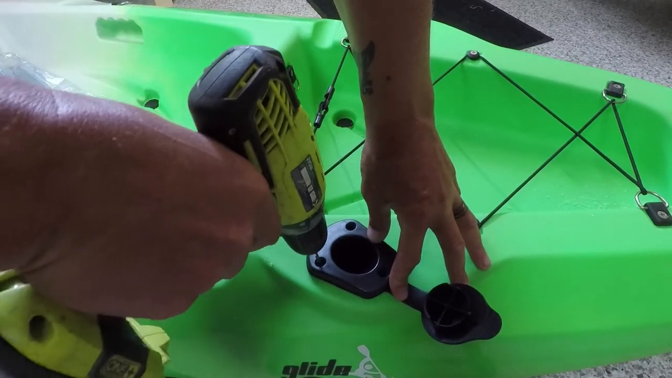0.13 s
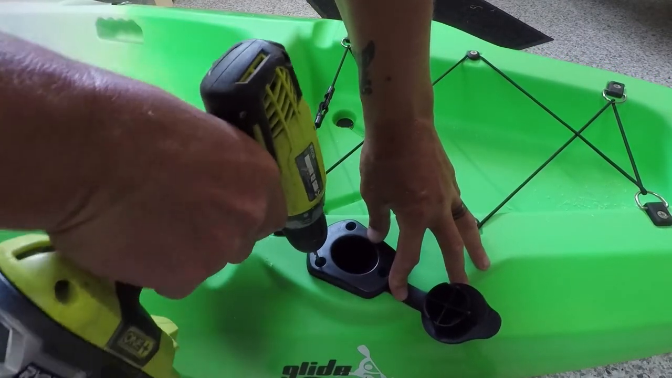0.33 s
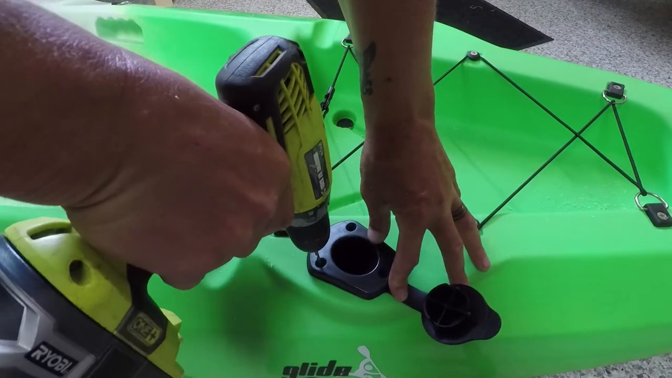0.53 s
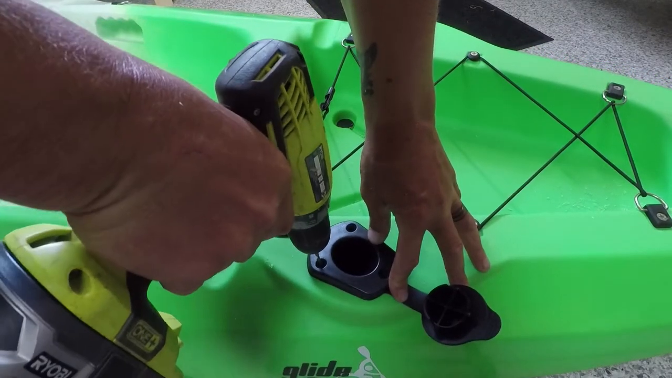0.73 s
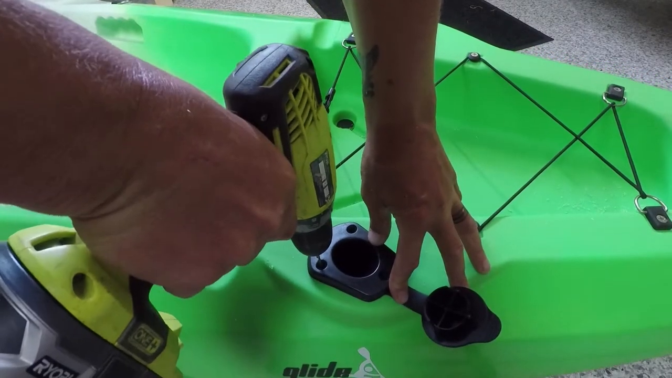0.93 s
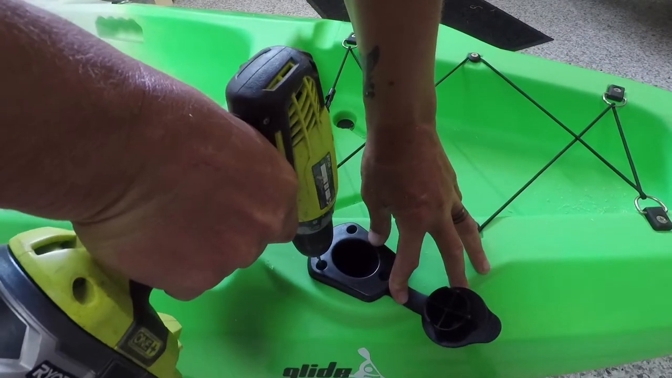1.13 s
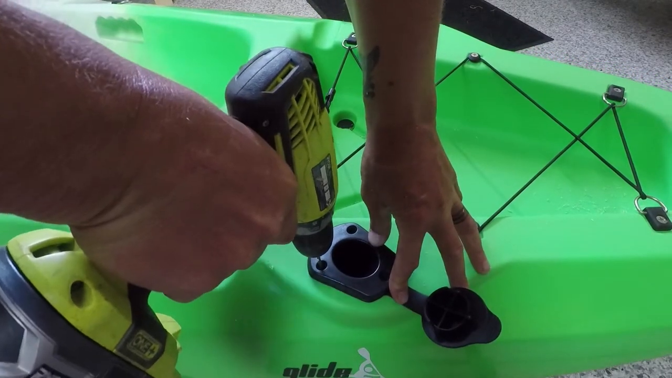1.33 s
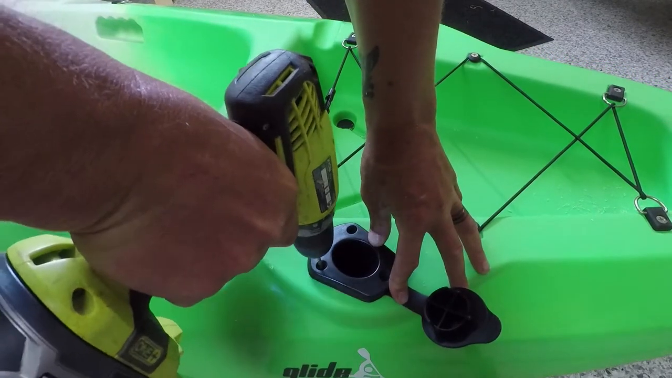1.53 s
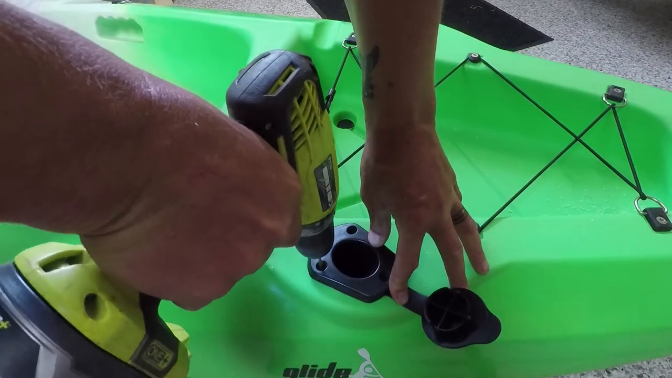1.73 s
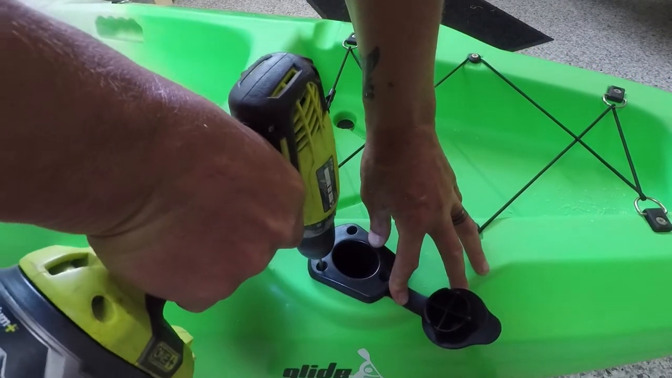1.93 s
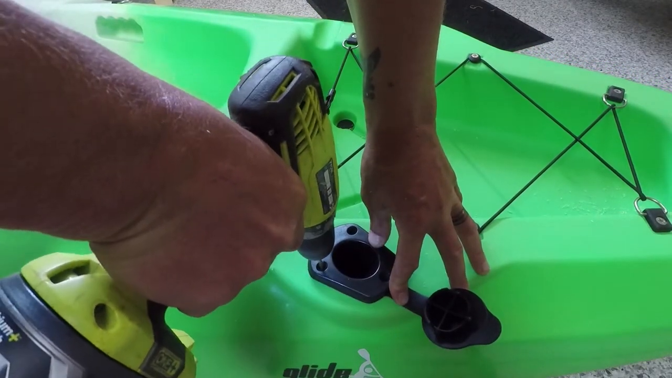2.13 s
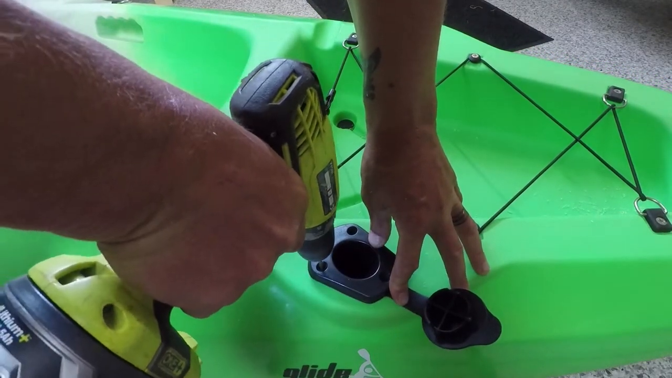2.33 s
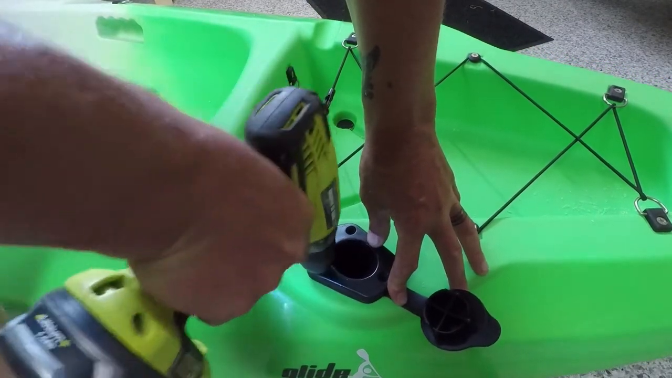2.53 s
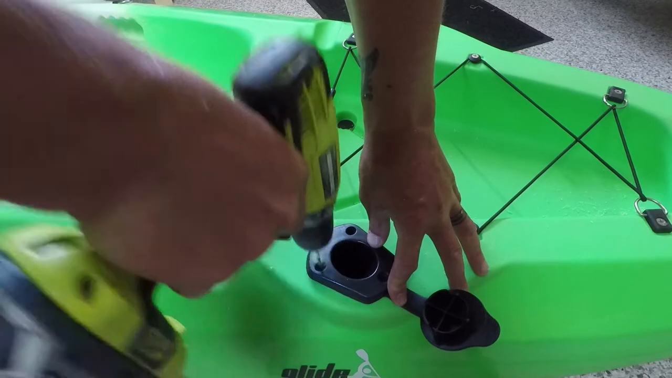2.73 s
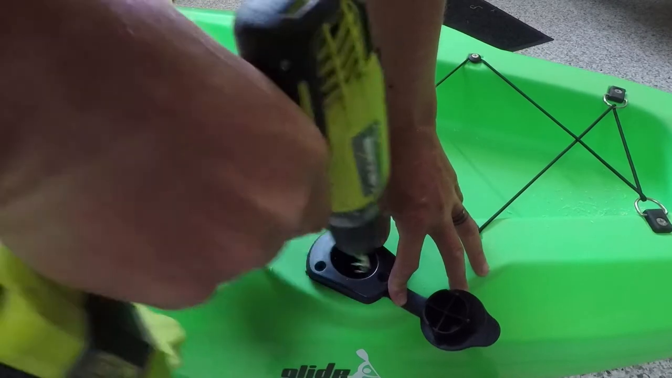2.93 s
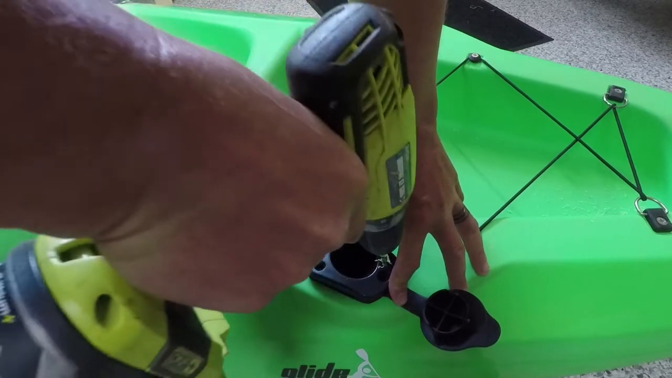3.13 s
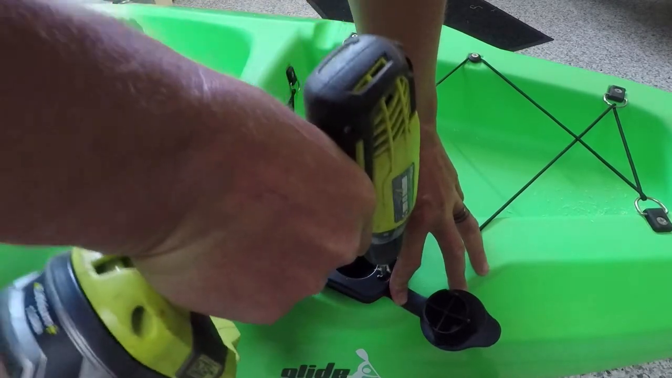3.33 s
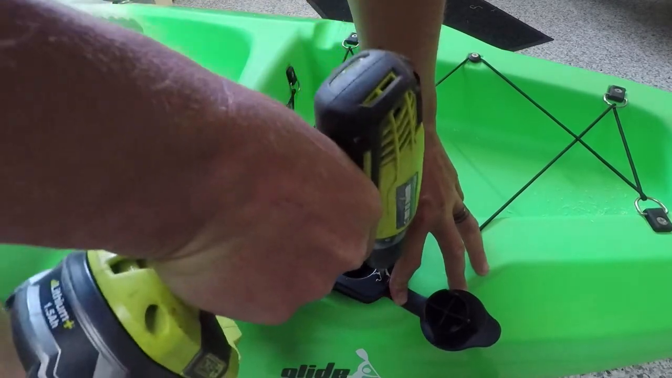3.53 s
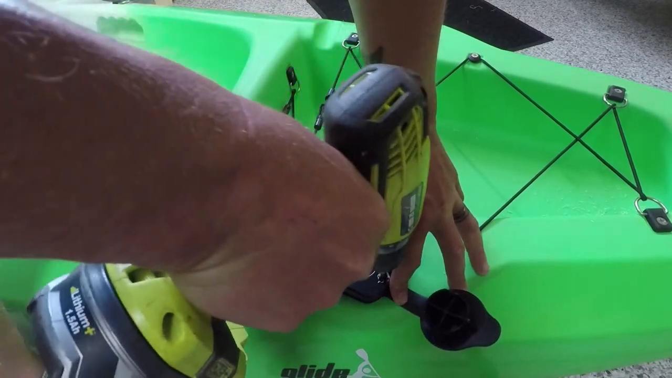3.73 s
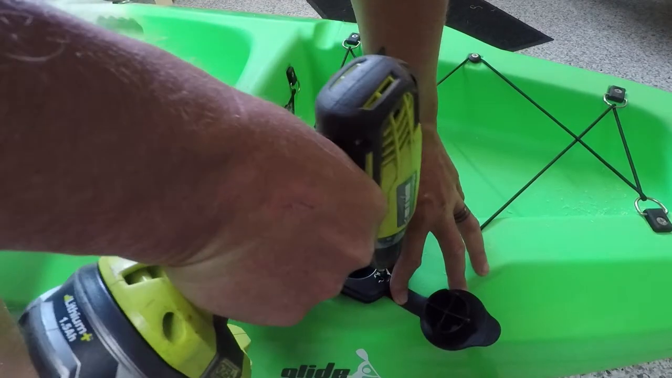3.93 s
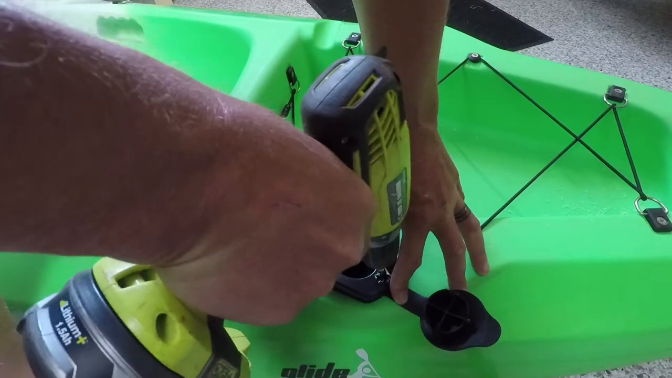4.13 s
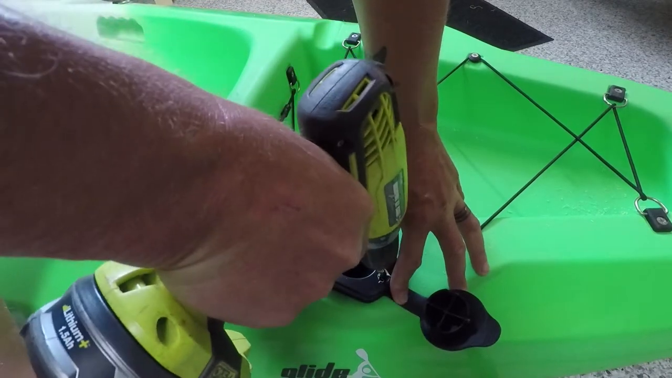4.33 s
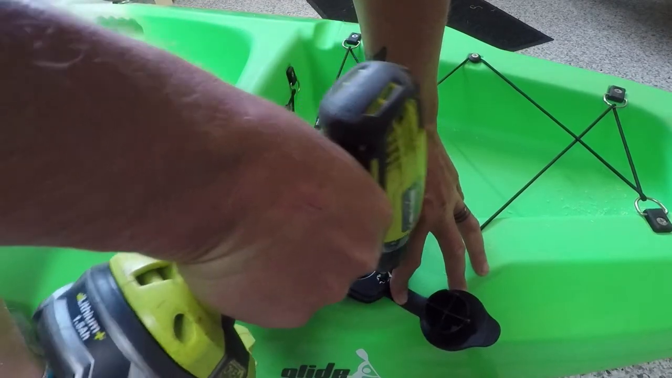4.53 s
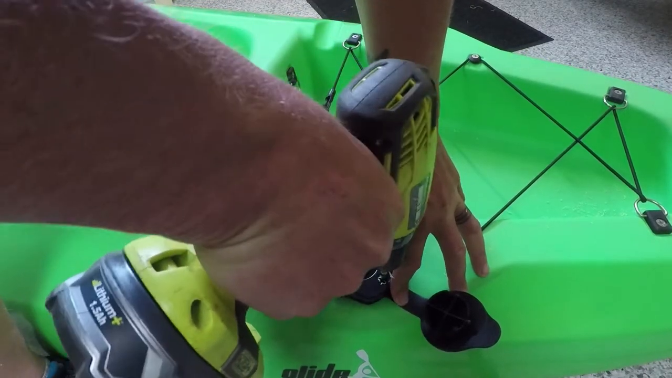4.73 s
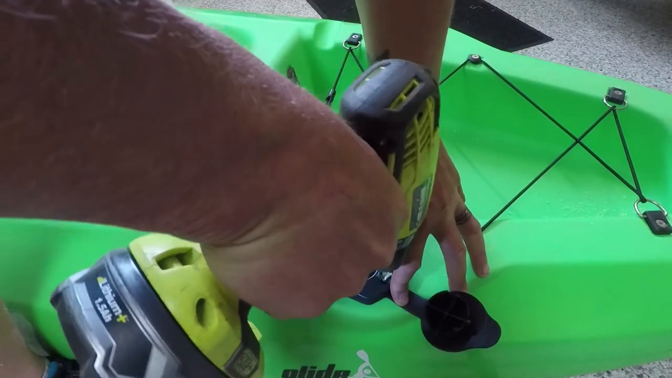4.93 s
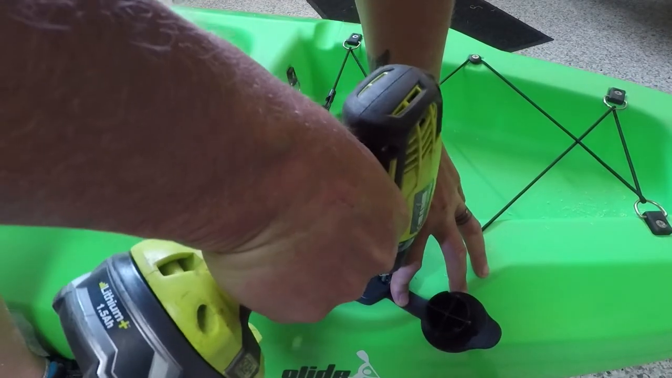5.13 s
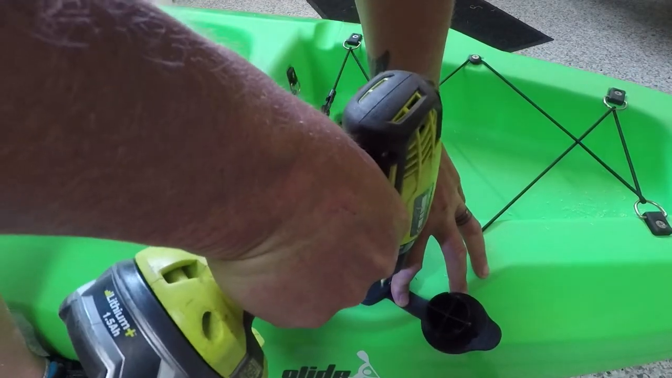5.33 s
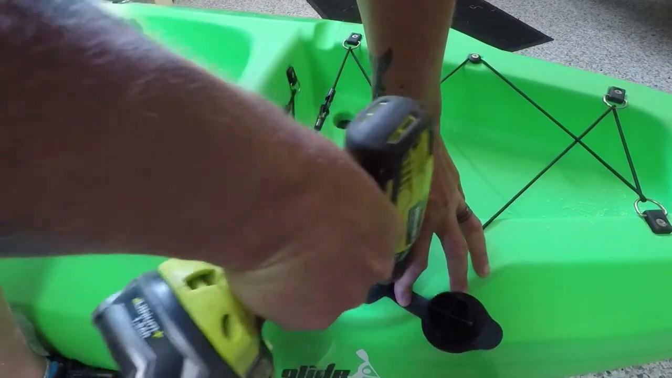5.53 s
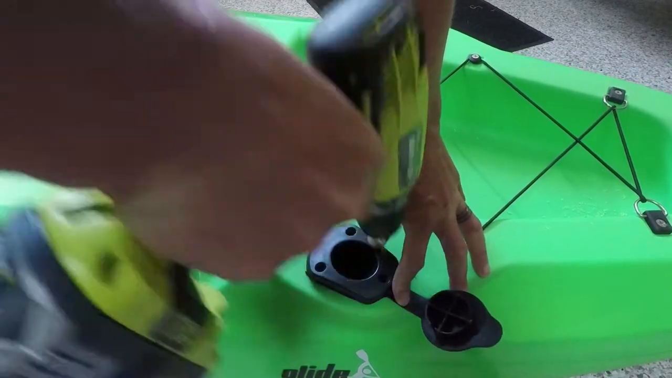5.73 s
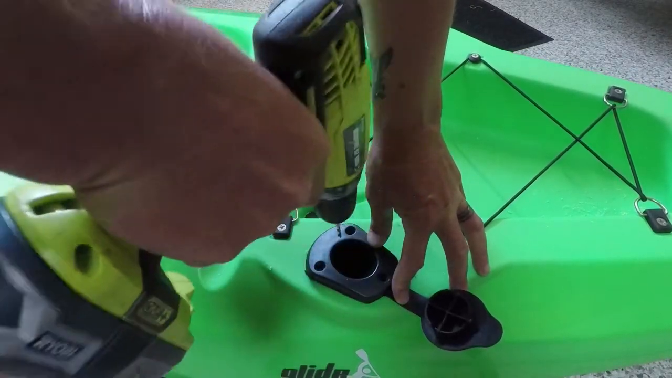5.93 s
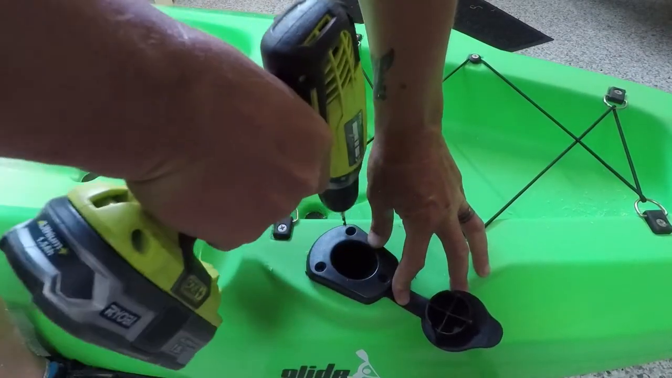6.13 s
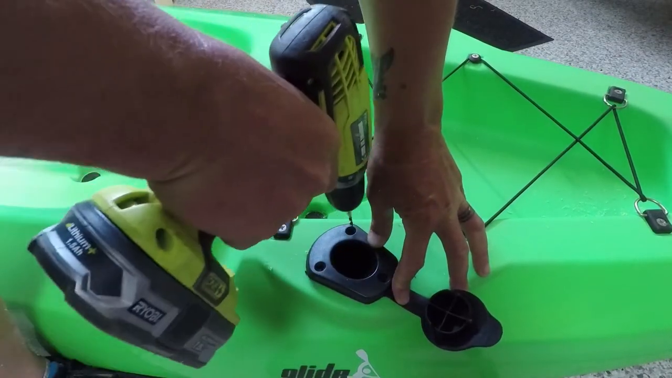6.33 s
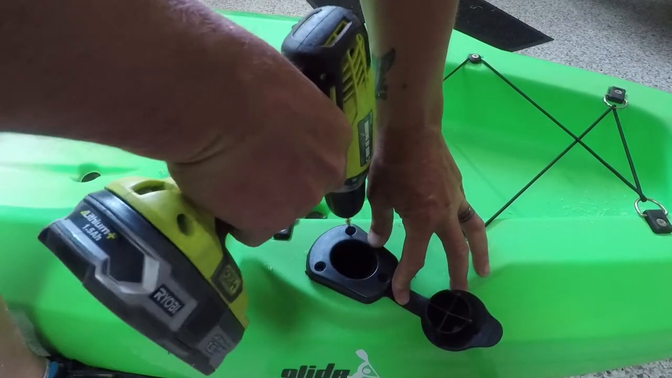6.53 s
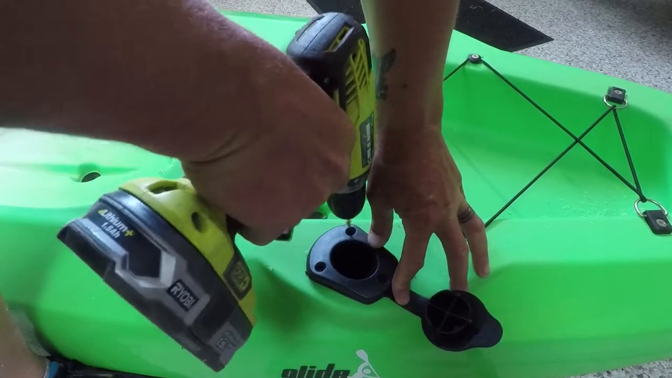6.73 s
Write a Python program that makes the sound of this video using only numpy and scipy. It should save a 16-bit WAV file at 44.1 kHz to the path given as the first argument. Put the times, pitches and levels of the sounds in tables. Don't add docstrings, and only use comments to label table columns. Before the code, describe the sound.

A cordless drill blips, then whines through hollow plastic with a rattling snag and clacking stop; after quiet handling taps, a second shorter run follows.

```python
import sys
import numpy as np
from scipy import signal
from scipy.fft import rfft, irfft, next_fast_len
from scipy.io import wavfile
from scipy.ndimage import uniform_filter1d

SR = 44100
rng = np.random.default_rng(int(sys.argv[2]) if len(sys.argv) > 2 else 0)


def makeup_ratio(level_db):
    decades = np.asarray(level_db, float) / 20
    return 10 ** decades


def output_pcm(signal):
    pcm = np.clip(np.atleast_2d(signal).T, -1, 1) * 32767
    wavfile.write(sys.argv[1], SR, np.round(pcm).astype(np.int16))


N = 299439

TEETH = 12
# shaft_multiple, level_db
SHAFT_ORDERS = [(1, -5), (2, 3), (3, -5), (4, -5), (5, 3), (6, -4), (8, 4), (10, 8), (11, -5.5), (13, 11),
                (14, -2.5), (15, 6), (16, 3), (17, 7), (18, 5), (19, 5), (20, 8), (21, 7), (22, 5),
                (24, 1.5), (25, 8), (27, 5), (28, 2), (30, 9), (32, 5), (35, 8), (41, 6), (42, 4)]
# pitch_hz, density_db_per_hz
GEARBOX_SHELL = [(180, -42), (300, -22), (358, -16.5), (495, -19.5), (686, -13), (1180, -11), (1760, -4),
                 (2590, -1), (3170, -8), (3870, -4.5), (4020, -9.5), (4730, -9.5), (6000, -14),
                 (7800, -38.5), (13200, -120)]
# pitch_hz, density_db_per_hz
FAN_VENTS = [(2650, -29), (4500, -2), (4720, -8), (5560, -6), (6700, -3), (7260, -6.5), (8600, 0),
             (9820, -11), (10700, -15), (10900, -17.5), (11600, -16), (12500, -12), (14700, -13),
             (15700, -23), (16000, -61)]
# pitch_hz, gain_db
ORDER_LIFT = [(200, -11.5), (345, -5), (520, -11), (700, -4), (1700, 1), (3400, 1), (4400, 4.5), (4900, 13),
              (5250, 4), (5800, -6.5), (7000, 5.5), (7700, -3.5), (8500, 7), (9600, -8.5), (10350, -1),
              (11100, -12), (12100, -4), (13000, -12), (14300, -8), (15500, -16)]
# pulled_s, released_s
PULLS_A = [
    (1.333, 1.434),
    (1.668, 2.712),
]
PULLS_B = [
    (4.823, 5.626),
]
BRAKE_A = 2.763
BRAKE_B = 5.673
# time_s, share_of_full_load
LOAD_A = [(1.87, 0), (2.006, 0.21), (2.244, 0.39), (2.336, 0.78), (2.37, 0.82), (2.412, 0.55),
          (2.442, 0.81), (2.712, 0.12)]
LOAD_B = [(4.95, 0.1), (5.24, 0.31), (5.3, 0.42), (5.345, 0.84), (5.38, 0.62), (5.452, 0.9), (5.622, 0.23)]
# full_speed_whine_db, shaft_hum_db, break_in_s, runs_free_s, bite_db
HOLE_A = (-26, -44.5, 2.5, 3, -27)
HOLE_B = (-21.5, -49.5, 5.5, 6, -27)
# time_s, peak_db, ring_hz, burst_ms
CLACKS = [(1.322, -22, 3000, 2), (1.3258, -5, 3700, 1.5), (1.330, -5.5, 2250, 2.6), (2.364, -10, 1750, 6.9),
          (5.377, -9.5, 1750, 5), (2.767, -14, 1514, 2.7), (2.7731, -9, 3700, 3), (2.777, -12, 1472, 5),
          (2.783, -17, 2400, 3), (2.7893, 3, 2000, 1.4), (2.7912, -1, 2204, 2), (2.7932, -1, 1800, 1.8),
          (2.7975, -8, 2100, 2.7), (2.803, -16, 1814, 2.3), (4.8153, -10.5, 2500, 2.5),
          (4.817, -8, 1603, 2.4), (4.8195, -19.5, 1820, 3.7), (5.676, -9.5, 1680, 6), (5.685, -8, 2094, 4),
          (5.695, -14, 3895, 3.9), (5.7003, 2, 1870, 2), (5.7045, -7, 2500, 1.3), (5.710, -11, 4000, 3.3),
          (5.7192, -4.5, 1610, 1.5), (5.7064, -9, 1500, 1.7), (5.689, -8, 2600, 3), (5.7231, 1, 2300, 1.7),
          (5.732, -17.5, 2500, 3), (5.738, -18, 1700, 3), (5.743, -12.5, 3820, 4), (5.748, -22, 2600, 3),
          (5.759, -28, 3500, 1.7), (5.768, -32, 1800, 3), (2.809, -21, 3900, 3.6), (2.816, -24, 1500, 2),
          (2.831, -26, 3000, 1.5)]
# pitch_hz, level_db, t60_s
DRILL_SHELL = [(1300, -1.5, 0.0049), (1710, -2, 0.016), (2500, -4.5, 0.013), (3300, -6.5, 0.0045),
               (4030, -4, 0.0079), (5470, -9.5, 0.0067), (7060, -6, 0.0044), (8730, -11.5, 0.012),
               (11100, -17, 0.001)]
# pitch_hz, level_db, t60_s
HULL = [(107, 1.5, 0.17), (149.6, -0.5, 0.18), (175, -0.5, 0.091), (241.3, -1, 0.1), (285, -10, 0.12),
        (345, -3, 0.083), (389, -1.5, 0.085), (453, -9.5, 0.093), (510, -5, 0.071), (630, -10, 0.1),
        (674, -13, 0.028), (820, -14, 0.085), (936, -11, 0.089), (1120, -14.5, 0.034), (1400, -22, 0.044)]
# time_s, peak_db,
# brightness_db, ring_hz
CATCHES = [(1.326, -26, -4, 600), (4.816, -27, -6, 597), (2.339, -24, -22, 110), (2.384, -22, -20, 150),
           (2.414, -10.5, -0.5, 405), (2.433, -12.5, -18.5, 387), (2.477, -23, -12, 353.5),
           (2.51, -21, -9, 428.3), (2.535, -22.5, -10, 383), (2.564, -16.5, -3.5, 943),
           (2.585, -19, -10, 364), (2.61, -20, -13, 360), (5.343, -22, -24, 120), (5.385, -27, -20, 110),
           (5.41, -11, -3.5, 405), (5.42, -14.5, -18, 150), (5.439, -15, -14.5, 352),
           (5.463, -14.5, -5.5, 338), (5.508, -15, -2.5, 399), (5.558, -27.5, -17, 415)]
# time_s, peak_db, ring_hz, treble_db
TICKS = [(0.08, -45, 2330, -14.5), (0.166, -41.5, 2090, -14), (0.437, -42.5, 2220, -13),
         (0.594, -51, 2220, -18), (0.66, -36.5, 840, -20), (0.691, -36.5, 934, 2), (0.756, -50, 1100, -5),
         (0.771, -45, 708, -28), (0.79, -45, 2040, -11), (0.806, -43, 1040, -1), (0.822, -53, 724, -24.5),
         (0.84, -49, 942, -26), (0.959, -41.5, 1630, -17), (0.997, -49, 974, -18), (1.02, -50, 1060, -15),
         (1.089, -44, 1707, -16), (1.119, -49.5, 1040, -16.5), (1.138, -55.5, 1250, -6),
         (1.164, -44, 907, 4), (1.286, -39.5, 2130, -0.5), (4.108, -45.5, 1710, -24),
         (4.691, -48, 734, -13), (4.716, -48.5, 1844, -13), (4.74, -60.5, 818, 1), (4.775, -56, 830, -15)]
# time_s, peak_db, boom_db, ring_hz, treble_db
KNOCKS = [(0.114, -54, -50, 2420, -15), (0.458, -48, -48.5, 1120, -21), (3.198, -50, -55, 1106, -20),
          (3.381, -33.5, -31, 1575, -17), (3.449, -58, -36.5, 982, -15), (3.483, -40, -35.5, 964, -32),
          (3.499, -44, -56, 1000, -31), (3.658, -31.5, -28.5, 1510, -15), (3.775, -60, -56, 856, -24),
          (3.795, -52, -53, 693, -16), (3.856, -54, -51.5, 790, -16), (4.506, -40, -27.5, 707, -27.5),
          (4.613, -49, -48, 2200, -15), (4.635, -35.5, -45.5, 900, -12), (6.177, -27, -19.5, 1780, -22),
          (6.36, -42, -33.5, 1790, -34), (6.413, -62.5, -45.5, 787, -23.5), (6.472, -36, -49, 2300, -16),
          (6.478, -27, -31.5, 1470, -19), (6.493, -39, -39.5, 1380, -10), (6.578, -42, -40, 3360, -15),
          (6.625, -49, -50, 1614, -23), (6.73, -39, -32.5, 1590, -20.5)]
# start_s, length_s, level_db, change_db
SCUFFS = [(0.153, 0.054, -65, 4), (0.7, 0.12, -59, -22), (3.44, 0.12, -49, -15.5),
          (3.56, 0.37, -58.5, -7.5), (4.224, 0.079, -72, 5), (4.641, 0.24, -59, -4),
          (6.181, 0.09, -48.5, -22), (6.475, 0.044, -54, -8), (6.549, 0.256, -69.5, 6)]
# pitch_hz, density_db_per_hz
SCUFF_SPECTRUM = [(240, -38), (400, -5.5), (887, -4.5), (967, -2), (1210, -12.5), (1300, -12),
                  (1590, -12.5), (1730, -2), (2030, -13.5), (2690, -12.5), (3480, -25.5), (5180, -21),
                  (12000, -35), (15600, -66), (22000, -120)]
# start_s, length_s, level_db, pitch_hz
SQUEAKS = [(3.437, 0.042, -61, 1750), (3.475, 0.045, -53, 960), (3.481, .03, -57, 2700),
           (3.48, .02, -63, 5300), (3.605, 0.034, -70, 5900), (3.615, .02, -70, 3650),
           (3.768, .008, -65, 7300), (3.793, 0.011, -60, 2650), (3.814, 0.031, -68, 3550),
           (3.82, 0.028, -70, 6320), (6.574, 0.017, -53.5, 5900), (6.575, .014, -56, 3300),
           (6.585, .06, -69, 6400), (6.59, 0.037, -68.5, 3400), (6.592, 0.015, -60, 1000),
           (6.469, .01, -52, 2300), (6.501, .025, -56, 1300), (6.725, 0.013, -58, 4800),
           (6.23, .03, -59, 950)]
# full_from_s, held_s, mount_rumble_db, hull_murmur_db
LEANS = [(0.0, 0.28, -53, -58.5), (0.4, 0.02, -37.5, -64), (0.55, 0.11, -49, -73), (0.76, 0.074, -72, -63),
         (0.96, 0.17, -72, -64.5), (1.5, 0.05, -52, -71), (1.83, 0.49, -45.5, -72.5),
         (2.42, 0.33, -41, -70), (3.44, 0.098, -46.5, -48.5), (3.68, 0.23, -45.5, -53),
         (4.07, 0.079, -58, -61.5), (4.55, 0.15, -68.5, -57.5), (5.0, 0.3, -50, -70),
         (5.39, 0.02, -35, -70.5), (5.5, 0.31, -46, -55), (6.24, 0.0096, -44, -41),
         (6.35, 0.48, -51.5, -56)]
# pitch_hz, t60_s
GARAGE_DECAY = [(150, 0.28), (700, 0.63), (2000, 0.56), (5000, 0.5), (12000, 0.38)]
# pitch_hz, level_db
WALLS = [(150, 1), (600, 0.5), (1100, -0.5), (1800, -6.5), (4000, -4.5), (6000, -0.5), (8500, -2.5),
         (15000, -2)]
# delay_s, level_db
SLAPS = [(.04, -15.5), (.072, -20)]
# pitch_hz, density_db_per_hz
FLOOR = [(29, -32.5), (50, 3), (131, -1), (213, -16.5), (495, -7.5), (802, -15.5), (1700, -17), (3180, -24),
         (13500, -32), (14900, -29.5), (16000, -56.5)]

FREE_HZ, START_HZ, SAG_HZ = 4196, 1200, 199.8
SPIN_UP_S, COAST_HZ_PER_S, BRAKING_S = 0.037, 4800, 0.033
RATTLE_DB, HISS_DB, SHAVING_DB = -26.5, -24.5, -45
WHINE_SLOW_DB, RATTLE_SLOW_DB, HISS_SLOW_DB = 22, 9.5, 20
WHINE_LOAD_DB, RATTLE_LOAD_DB, HISS_LOAD_DB = -1, 2, 0.4
PULL_DB = 11.5
COASTING_DB, THROUGH_DB = -3.5, -2.5
BITE_RISE_DB_PER_S, BITE_SAG_DB_PER_S, BITE_FALL_DB_PER_S = 250.5, 20.5, 71
CLACK_TREBLE_DB = -9
TICK_BOOM_DB, TICK_MS, KNOCK_MS = -21, 4.8, 6.5
RUMBLE_ON_DB_PER_S, MURMUR_ON_DB_PER_S, LEAN_OFF_DB_PER_S = 198, 603, 100.5
STILL_RUMBLE_DB, STILL_MURMUR_DB = -75.5, -72.5
SQUEAK_WIDTH = 0.054
FLOOR_DB = -62.5


def motor(*run):
    start, mesh_hz, (whine_db, rattle_db, hiss_db, bite_db, hum_db) = controls(*run)
    n = len(mesh_hz)
    turns = np.cumsum(mesh_hz / TEETH) / SR + .004 * wander(n, 25)
    whine = (1 + 0.15 * wander(n, 100)) * np.cos(2 * np.pi * TEETH * turns)
    knocks = rng.standard_normal(n) * makeup_ratio(1.2 * wander(n, 400) + 0.4 * wander(n, 30))
    rattle = colour(knocks, GEARBOX_SHELL)
    gusts_db = 1.2 * wander(n, 450) + .6 * np.cos(2 * np.pi * turns)
    hiss = colour(rng.standard_normal(n) * makeup_ratio(gusts_db), FAN_VENTS)
    chips = rng.standard_normal(n) * makeup_ratio(5.0 * wander(n, 45))
    bite = unit_rms(signal.oaconvolve(chips, ring(HULL, damping=2.0, tilt_db=12.5))[:n])
    unbalance = np.cos(2 * np.pi * turns) + makeup_ratio(-2) * np.cos(2 * 2 * np.pi * turns)
    hum = (1 + .45 * wander(n, 30)) * unbalance

    slack_db = 19 * (1 - mesh_hz / mesh_hz.max())
    sound = makeup_ratio(whine_db + 2.5) * whine
    sound += makeup_ratio(hiss_db - 7.0 + slack_db) * shaft_pattern(turns)
    sound += makeup_ratio(rattle_db + 2.07) * rattle
    sound += makeup_ratio(hum_db + 3.5) * hum
    sound += makeup_ratio(hiss_db - 0.3) * hiss
    sound += makeup_ratio(bite_db - 1.0) * bite
    return start, sound * signal.windows.tukey(n, .006)


def controls(pulls, brake_s, load_rows, hole):
    whine_db, hum_db, break_s, free_s, bite_db = hole
    t = np.arange(pulls[0][0], brake_s + BRAKING_S, 1 / SR)
    load = np.interp(t, *np.transpose(load_rows))
    braking = np.maximum(t - brake_s, 0) / BRAKING_S
    hz = (spin(t, pulls) - SAG_HZ * load) * (1 - 0.38 * braking ** 1.5)
    slow = 1 - hz / FREE_HZ
    before_release = t < pulls[-1][1]
    between_pulls = 1. * (t < pulls[-1][0]) * (t > pulls[0][1])
    coasting = uniform_filter1d(between_pulls, size=900)
    through = np.clip((t - break_s) / 0.06, 0, 1)

    whine = whine_db - WHINE_SLOW_DB * slow + WHINE_LOAD_DB * load - 17 * braking
    whine += PULL_DB * slow * (1 - coasting) * before_release
    rattle = RATTLE_DB - RATTLE_SLOW_DB * slow + RATTLE_LOAD_DB * load
    rattle += COASTING_DB * coasting + THROUGH_DB * through * before_release
    hiss = HISS_DB - HISS_SLOW_DB * slow + HISS_LOAD_DB * load - 3 * braking
    bite = bite_db + plateau(t, break_s, free_s, BITE_RISE_DB_PER_S, BITE_FALL_DB_PER_S)
    bite -= BITE_SAG_DB_PER_S * np.maximum(t - break_s, 0)
    hum = hum_db - 30 * slow - 4 * coasting - 5 * through - 12 * braking
    return t[0], hz, (whine, rattle, hiss, np.maximum(bite, SHAVING_DB), hum)


def spin(t, pulls):
    hz, reached, since = np.zeros(len(t)), START_HZ, t[0]
    for on, off in pulls:
        reached -= COAST_HZ_PER_S * (on - since)
        powered = FREE_HZ - (FREE_HZ - reached) * np.exp(-(np.clip(t, on, off) - on) / SPIN_UP_S)
        hz = np.where(t >= on, powered - COAST_HZ_PER_S * np.maximum(t - off, 0), hz)
        reached, since = powered[-1], off
    return hz


def shaft_pattern(turns):
    multiples = np.arange(1, 43)
    db = np.zeros(len(multiples))
    for multiple, level_db in SHAFT_ORDERS:
        db[round(multiple) - 1] = level_db
    db[TEETH - 1] = -99
    phase, pace, lag = rng.random((len(db), 3)).T
    t = np.arange(len(turns)) / SR
    total = np.zeros(len(turns))
    for i, multiple in enumerate(multiples):
        swell = 1 + .5 * np.sin(2 * np.pi * ((2 + 5.0 * pace[i]) * t + lag[i]))
        total += makeup_ratio(db[i]) * swell * np.cos(2 * np.pi * (multiple * turns + phase[i]))
    return colour(total, ORDER_LIFT)


def clack(s, db, hz, ms):
    force = burst(ms)
    modes = [(hz, 2.5, .006)] + DRILL_SHELL
    shell = ring(modes, damping=1.6, tilt_db=CLACK_TREBLE_DB + 7, spot_db=4.5)
    sound = peaked(signal.fftconvolve(force, shell), -7)
    crack = colour(force, [(250, -30), (800, -9), (hz, 0), (4300, -5), (5500, CLACK_TREBLE_DB),
                           (9000, CLACK_TREBLE_DB - 3.5), (15000, CLACK_TREBLE_DB - 15.0)])
    add(sound, 0, peaked(crack, 0))
    sound = highpass(sound, 2, 850)
    return s - .001, peaked(sound, db)


def catch(s, db, bright_db, hz):
    hull = ring([(hz, -2, .2)] + HULL, damping=3.0, tilt_db=27.5 + bright_db, spot_db=0.5)
    return s - .001, peaked(signal.fftconvolve(burst(8.4), hull), db - 0.5)


def knock(*row):
    return touch(*row, KNOCK_MS)


def tick(s, db, hz, treble_db):
    return touch(s, db, db + TICK_BOOM_DB, hz, treble_db, TICK_MS)


def touch(s, db, boom_db, hz, treble_db, ms):
    tick_sound = colour(burst(ms), [(300, -30), (800, -7), (hz, 0), (4500, treble_db + 4),
                                    (9000, treble_db + 2), (16000, treble_db - 25.0)])
    boom = signal.fftconvolve(burst(1.5), ring(HULL, damping=0.76, tilt_db=-25.5, spot_db=2.0))
    out = makeup_ratio(boom_db - 9) * boom / np.sqrt(np.mean(boom[:1500] ** 2))
    add(out, 0, peaked(tick_sound, db))
    return s - .001, out


def scuff(start, length, first_db, change_db):
    db = np.linspace(first_db, first_db + change_db, round(length * SR))
    slips = rng.standard_normal(len(db)) * makeup_ratio(3.0 * wander(len(db), 120))
    return start, makeup_ratio(db) * colour(slips, SCUFF_SPECTRUM) * signal.windows.tukey(len(db), .15)


def squeak(start, length, db, hz):
    slips = rng.standard_normal(4000)[:round(length * SR)]
    low, high = hz * (1 - SQUEAK_WIDTH), hz * (1 + SQUEAK_WIDTH)
    band = [(hz * .6, -40), (low, -12), (hz, 0), (high, -12), (hz * 1.7, -40)]
    return start, makeup_ratio(db) * colour(slips, band) * np.hanning(len(slips))


def hands():
    t = np.arange(N) / SR
    s, held, sway_db, press_db = np.transpose(LEANS)[:, :, None]
    sway = sway_db + plateau(t, s, s + held, RUMBLE_ON_DB_PER_S, LEAN_OFF_DB_PER_S)
    press = press_db + plateau(t, s, s + held, MURMUR_ON_DB_PER_S, LEAN_OFF_DB_PER_S)
    rumble_db = np.maximum(sway.max(axis=0), STILL_RUMBLE_DB)
    murmur_db = np.maximum(press.max(axis=0), STILL_MURMUR_DB)
    rumble = colour(rng.standard_normal(N), [(3, -3.5), (8, 10.0), (28, -4.5), (50, -20.5), (100, -62.0)])
    murmur = unit_rms(signal.oaconvolve(rng.standard_normal(N), ring(HULL, tilt_db=-25.5))[:N])
    return 0, makeup_ratio(rumble_db) * rumble + makeup_ratio(murmur_db) * murmur


def garage(x):
    taps = np.zeros(SR)
    at = np.arange(300, SR - 20, 20)
    taps[at + rng.integers(0, 20, len(at))] = rng.choice([-1., 1.], len(at))
    hz, t, z = signal.stft(taps, SR, nperseg=256)
    decay = makeup_ratio(-60 * t / read(GARAGE_DECAY, hz)[:, None])
    tail = signal.istft(z * decay, SR, nperseg=256)[1]
    tail = colour(tail, WALLS) / np.sqrt(len(tail))
    for s, db in SLAPS:
        tail[round(s * SR)] += makeup_ratio(db)
    return signal.fftconvolve(x, tail)[:N]


def room_floor():
    return makeup_ratio(FLOOR_DB) * colour(rng.standard_normal(N), FLOOR)


def ring(modes, damping=1, tilt_db=0, spot_db=0):
    t = np.arange(round(SR * .9 * max(m[2] for m in modes) / damping)) / SR
    top = max(m[0] for m in modes)
    luck = rng.standard_normal(len(modes))
    total = np.zeros(len(t))
    for k, (hz, db, t60) in zip(luck, modes):
        level_db = db + spot_db * np.sin(9 * k) + tilt_db * hz / top
        decay = makeup_ratio(level_db - 60 * damping * t / t60)
        total += np.sign(k) * decay * np.sin(2 * np.pi * hz * t)
    return total


def burst(ms):
    t = np.maximum(np.arange(-40, 2008) / SR, 0)
    shape = np.exp(-1000 * t / max(ms, .2)) * np.minimum(t / 0.00046, 1)
    z = rfft(rng.standard_normal(len(t)) * shape)
    flat = z / (abs(z) + .15 * abs(z).mean())
    return irfft(flat, len(t)) * shape ** .25


def plateau(t, start, end, on_db_per_s, off_db_per_s):
    return -on_db_per_s * np.maximum(start - t, 0) - off_db_per_s * np.maximum(t - end, 0)


def wander(count, hz):
    return unit_rms(signal.lfilter(*signal.butter(2, hz, fs=SR), rng.standard_normal(count)))


def colour(x, points):
    size = next_fast_len(len(x))
    gain = makeup_ratio(read(points, np.fft.rfftfreq(size, 1 / SR)))
    return unit_rms(irfft(rfft(x, size) * gain, size)[:len(x)])


def read(points, hz):
    f, value = np.transpose(points)
    return np.interp(np.log(hz + 1), np.log(f + 1), value)


def highpass(x, order, hz):
    return signal.sosfilt(signal.butter(order, hz, "high", fs=SR, output="sos"), x)


def unit_rms(x):
    return x / np.sqrt(np.mean(x ** 2) + 1e-20)


def peaked(x, db):
    return makeup_ratio(db) * x / abs(x).max()


def add(mix, s, sound):
    part = mix[round(s * SR):][:len(sound)]
    part += sound[:len(part)]


def scene():
    near, close = np.zeros(N), np.zeros(N)
    runs = [(PULLS_A, BRAKE_A, LOAD_A, HOLE_A), (PULLS_B, BRAKE_B, LOAD_B, HOLE_B)]
    for source, table in ((motor, runs), (clack, CLACKS), (catch, CATCHES), (knock, KNOCKS), (tick, TICKS)):
        for row in table:
            add(near, *source(*row))
    for source, table in ((scuff, SCUFFS), (squeak, SQUEAKS)):
        for row in table:
            add(close, *source(*row))
    add(close, *hands())
    near = highpass(near, 3, 70)
    mono = near + makeup_ratio(-17.5) * garage(near) + close + room_floor()
    return np.array([mono, mono])


def top_cut(x):
    return signal.sosfilt(signal.butter(12, 16450, fs=SR, output="sos"), x)


def record(dry):
    limited = 1.25 * np.tanh(dry / 1.25)
    edge = signal.firwin(801, 15320, window=("kaiser", 7), fs=SR)
    finished = signal.oaconvolve(limited, edge[None], "same")
    return top_cut(finished)


dry = scene()
out = record(dry)
output_pcm(out)
```